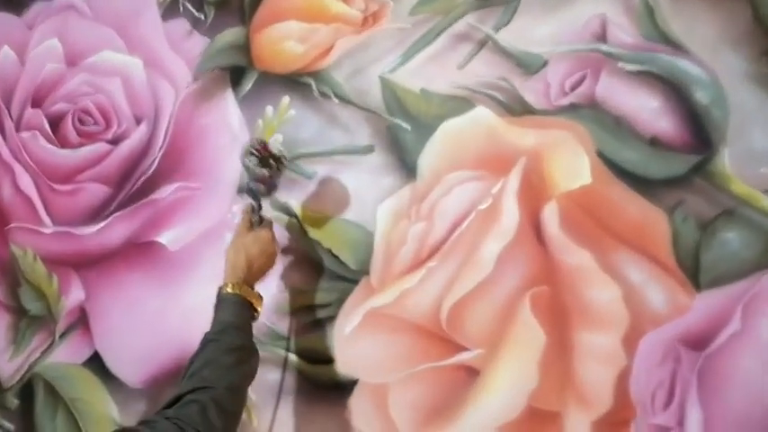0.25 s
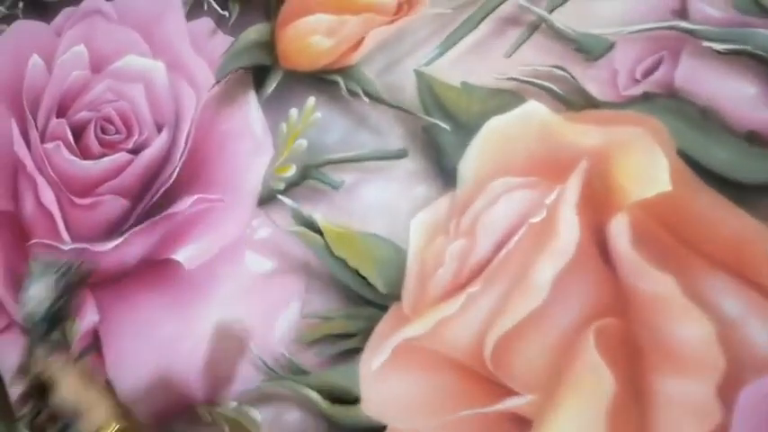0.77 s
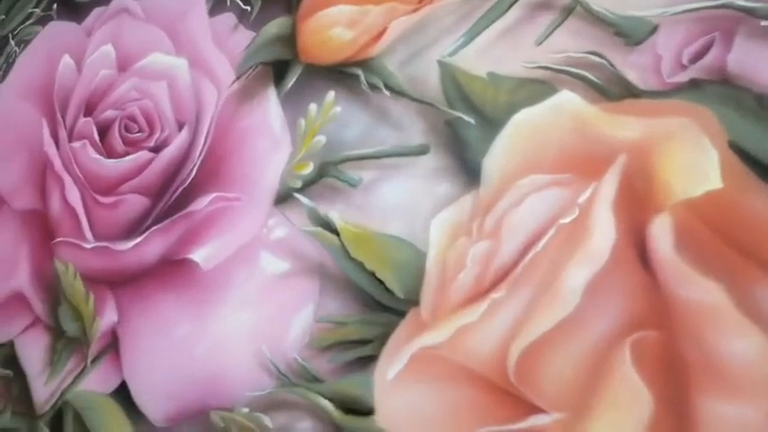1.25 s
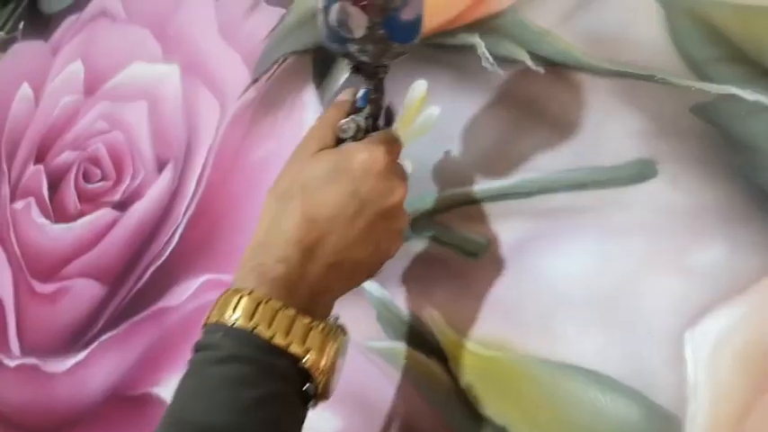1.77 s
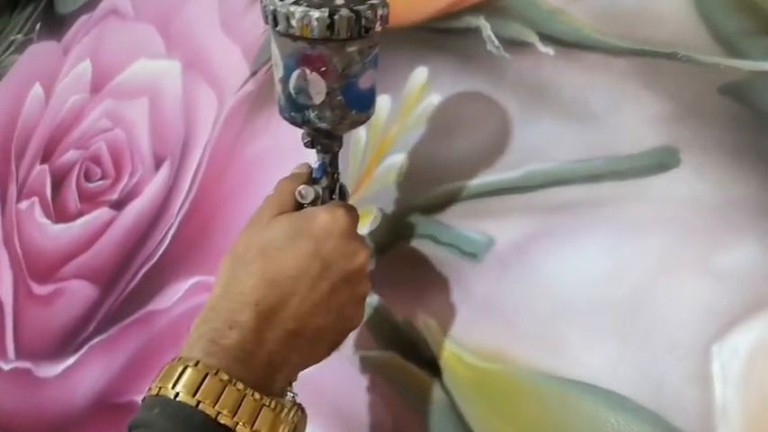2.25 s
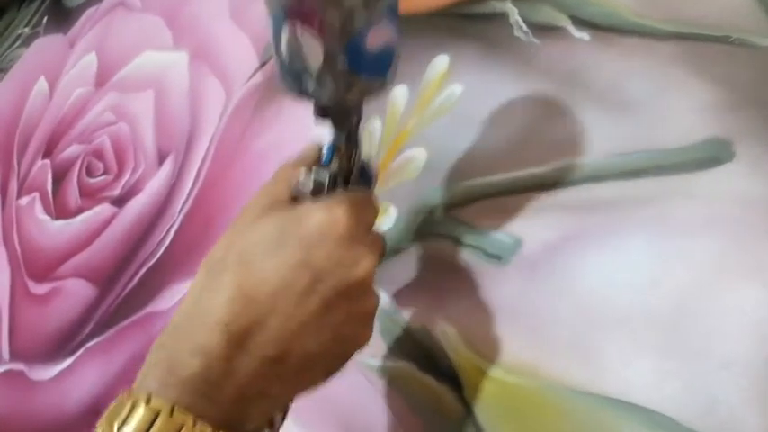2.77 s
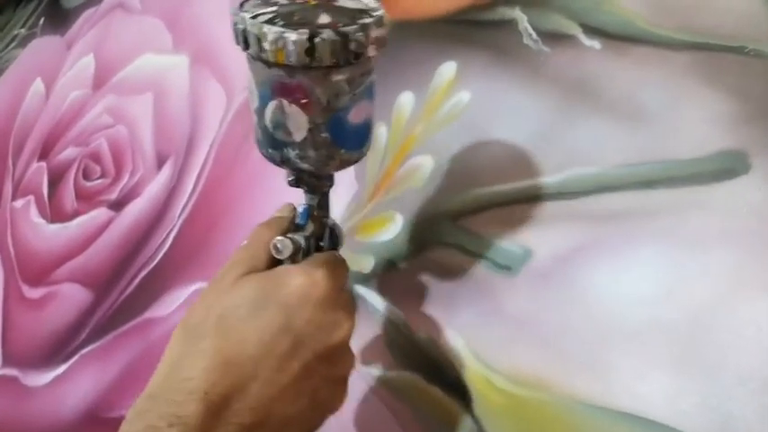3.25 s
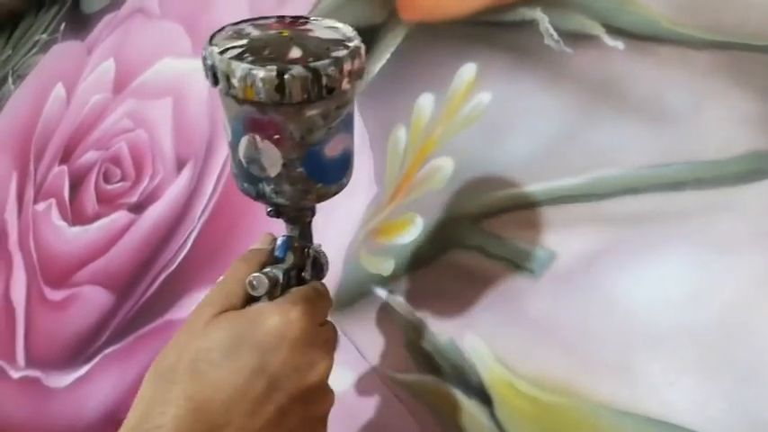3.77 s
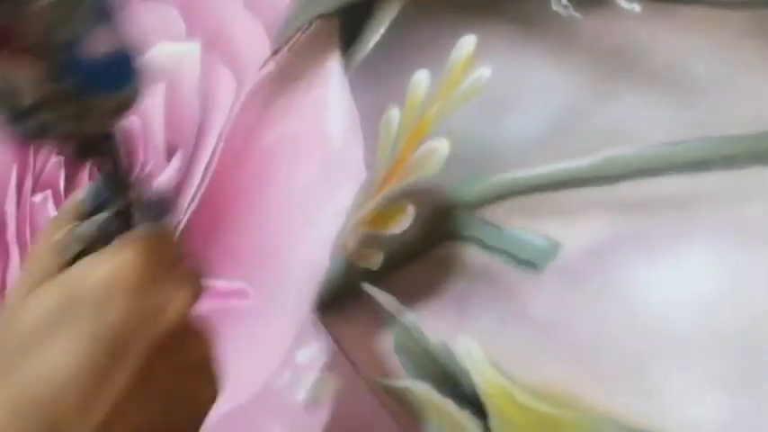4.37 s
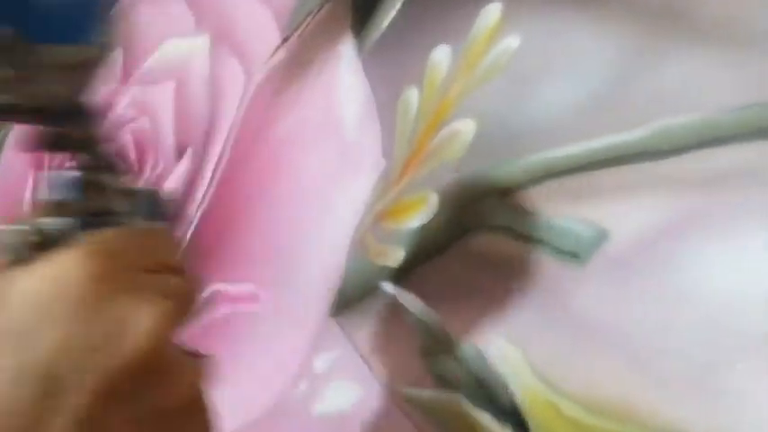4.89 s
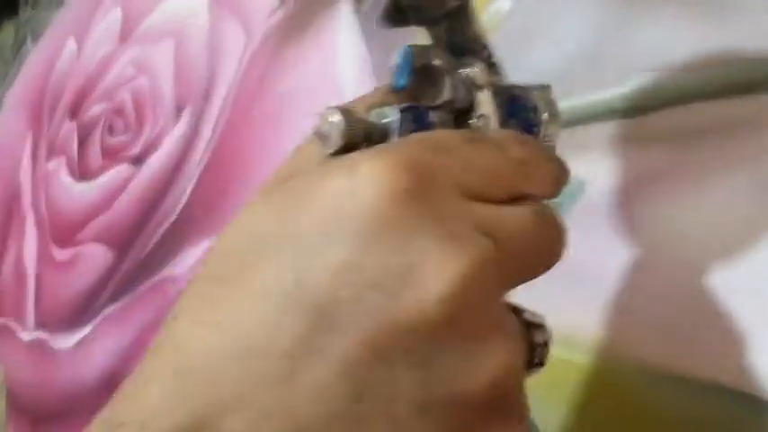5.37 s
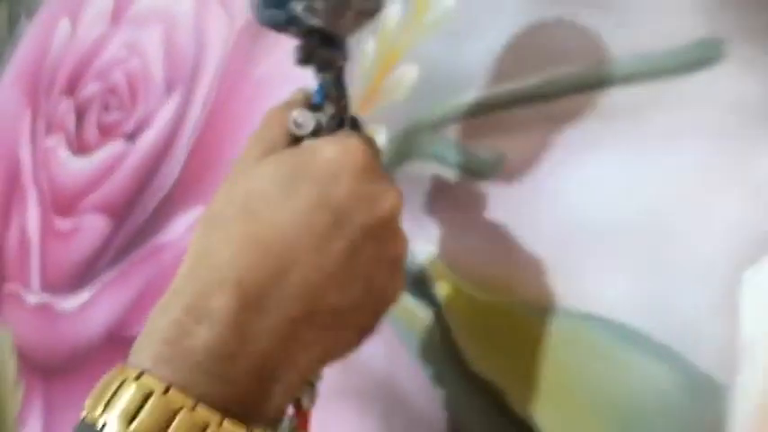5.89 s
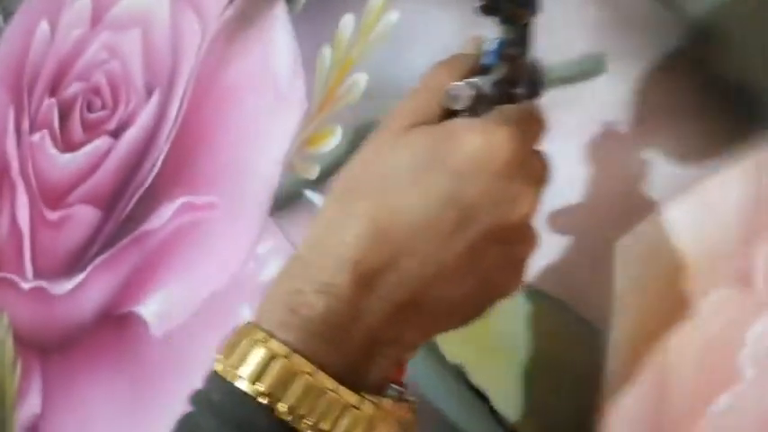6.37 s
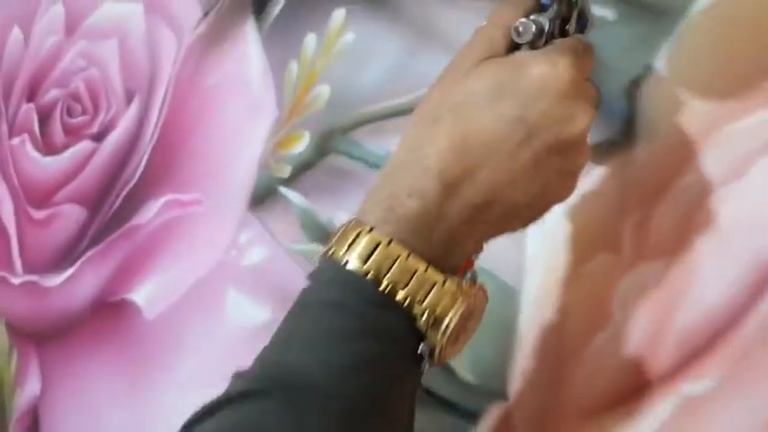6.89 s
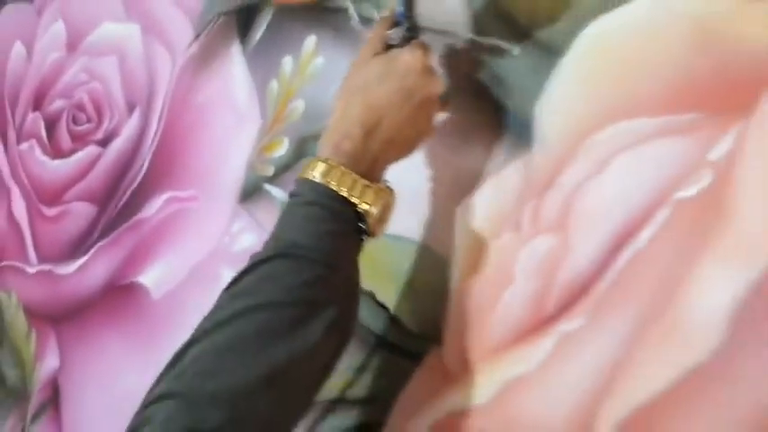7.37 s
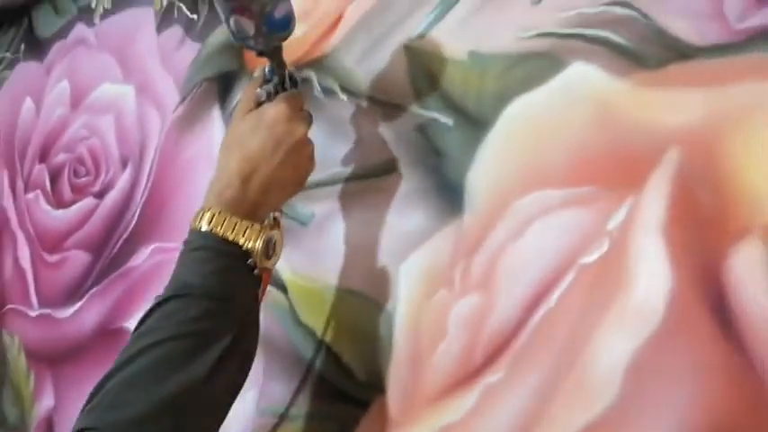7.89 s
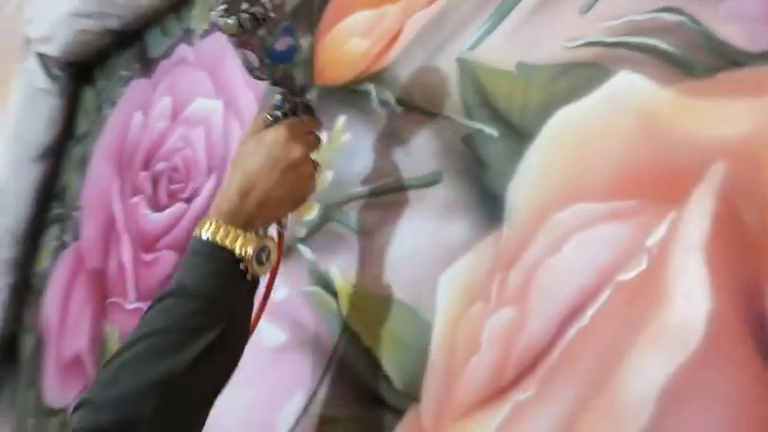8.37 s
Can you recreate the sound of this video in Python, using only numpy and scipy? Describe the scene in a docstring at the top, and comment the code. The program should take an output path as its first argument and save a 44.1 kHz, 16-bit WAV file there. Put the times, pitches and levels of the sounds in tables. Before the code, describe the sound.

Sharp airy paint-spray hiss in long bursts, broken by a pause with a low compressor drone, then a split-second trigger release before continuing.

```python
"""Spray gun on a wall

A small spray gun hisses paint onto a wall close by; the trigger is let go twice.
The jet is shaped noise at the nozzle, the wall wash is a lagging diffuse noise, and a few close tones whine.
A piston compressor, summed from shaft orders and puffs, throbs in the long pause; a faint room lies under all."""
import sys
import numpy as np
from scipy import signal
from scipy.fft import rfft, irfft, next_fast_len
from scipy.io import wavfile
from scipy.ndimage import uniform_filter1d, map_coordinates

SR = 44100
rng = np.random.default_rng(int(sys.argv[2]) if len(sys.argv) > 2 else 0)


def materialize(psi):
    """Save the field psi as 16-bit PCM at rate SR to the path in sys.argv[1].

    A 1-D psi becomes a single channel; in a 2-D psi each row is a channel.
    """
    bounded = np.clip(np.atleast_2d(psi).T, -1, 1)
    quanta = np.round(bounded * 32767).astype(np.int16)
    wavfile.write(sys.argv[1], SR, quanta)


N = 381024

# Trigger pulls: pulled t/s, opening time/s, released t/s
TRIGGER_PULLS = [(-.2, .1, .54), (1.44, .11, 4.865), (4.943, .07, 8.64)]
# Valve closing: a fast drop, then a thin tail lingering in the room
CLOSING_DB_PER_S, TAIL_DB, TAIL_DB_PER_S = 255, -12.5, 93
JET_LEAK_DB, WASH_LEAK_DB = -50, -38  # what remains of each while the valve is closed

# The gun nearing and leaving the microphone: t/s, open jet level before trim/dB
NEARNESS = [(0, -31.5), (.22, -33.5), (.4, -33), (.52, -35), (1.53, -28.5), (1.62, -27.5), (1.72, -29),
            (1.77, -32.5), (1.81, -30.5), (1.85, -27), (1.96, -27), (2.1, -28), (2.55, -29.5), (2.79, -29),
            (2.95, -32.5), (3.22, -31), (3.45, -33), (3.8, -32.5), (4.07, -33.5), (4.29, -32.5),
            (4.48, -35), (4.82, -35), (5.01, -35.5), (5.08, -36), (5.21, -40), (5.31, -33.5), (5.5, -33),
            (5.78, -34), (5.9, -37), (6.2, -36), (6.55, -35.5), (6.67, -37.5), (7.3, -37.5), (7.5, -37),
            (8.1, -38.5), (8.33, -35.5), (8.64, -37.5)]
# The hand swings the nozzle from side to side: t/s, left minus right level/dB
NOZZLE_AIM = [(0, -2), (1.5, -3), (1.95, 0), (2.55, -1), (2.9, 4), (3.25, -1), (4.25, 0), (4.5, 2.5),
              (4.75, -2.5), (5.02, 3), (5.22, -1.5), (5.48, 5.5), (5.76, 6), (6.15, -1.5), (6.85, 5.5),
              (7.3, 0.5), (8.64, -1.5)]
# Spectrum of the jet core: f/Hz, relative level/dB
NOZZLE_SPECTRUM = [(2500, -65), (4200, -17), (5200, -10), (5850, -4.5), (6250, -5.5), (7200, 1),
                   (7800, 1.5), (8400, -7), (9300, -4), (10500, -8.5), (12000, -10.5), (14000, -13.5),
                   (15100, -12.5)]
# Spectrum of the bright lobe facing ahead: f/Hz, relative level/dB
LOBE_SPECTRUM = [(7800, -40), (8700, -1.5), (9400, -7.5), (10100, -8), (11000, -13), (12500, -46),
                 (15000, -44)]
LOBE_DB, LOBE_PER_AIM = -12.5, -0.87  # level against the core; dB change per dB of swing to the left
# Balance of the two microphone ports: f/Hz, left minus right level/dB
PORT_BALANCE = [(4000, -2), (6000, 0.5), (7500, 3.5), (8400, 4), (9700, -5.5), (11500, -3.5), (13000, 6),
                (15000, 0)]
# Likeness of the two ports: f/Hz, correlation (1 is identical)
PORT_LIKENESS = [(60, 1), (300, 0), (700, 0), (1500, 0.12), (3200, 0.066), (5500, 0), (6400, 0.33),
                 (7200, 0.64), (8300, 0.63), (10000, 0.74), (12000, 0.54), (15000, 0.12)]

# Depth of the wash on the wall: t/s, low-edge level against the usual/dB
WASH_DEPTH = [(0, -4.5), (.33, 3), (.62, -3.5), (1.55, -8), (1.78, 6.5), (2.14, -13), (2.28, 7), (2.42, 13),
              (2.68, 8), (2.87, -9), (3.25, 10), (3.65, -3), (4.45, -6.5), (4.8, 0), (5.01, -15), (5.18, 4),
              (5.43, -11), (5.85, 4.5), (6.2, 8), (6.6, -0.5), (6.87, -5), (7.42, 12), (7.9, 1.5),
              (8.64, -4)]
# Wash against its usual share: t/s, level/dB
WASH_SHARE = [(0, -2), (.5, 0), (1.5, 3.5), (1.95, 0.3), (2.35, 0), (4.5, 0), (4.8, 0.5), (5.2, 0.5),
              (5.6, -5), (6.2, -0.5), (6.5, 0.5), (7.1, -3), (7.6, -.5), (8.3, 1)]
# Spectrum of the upper wash: f/Hz, relative level/dB
UPPER_SPECTRUM = [(1400, -42), (2000, -8.5), (2400, -0.5), (2900, .5), (3500, -0.5), (4300, -1.5),
                  (5500, 1), (8000, -30)]
# Spectrum of the wash body: f/Hz, relative level/dB
BODY_SPECTRUM = [(1050, -76), (1400, -9), (1650, -3), (2000, 0.5), (2400, -9.5), (3200, -29)]
# Spectrum of the deep wash: f/Hz, relative level/dB
DEEP_SPECTRUM = [(700, -10), (950, -15), (1130, -3.5), (1350, -7), (1650, -19), (2400, -79)]
# Wash bands: base level in dB, and the share of the depth that two of them follow
UPPER_DB, UPPER_FOLLOWS = -10.5, 0.13
BODY_DB, BODY_FOLLOWS = -20.5, 0.44
DEEP_DB = -30
USUAL_NEAR_DB, WASH_PER_NEAR = -35.5, 0.075  # usual jet level; extra wash dB per dB above it
WASH_LAG_S = 0.01
WASH_CLOSES, WASH_OPENS = 0.69, 1.3  # share of the jet's closing speed; multiple of its opening time

# Narrow resonances colouring the hiss: f/Hz, width/Hz, peak level/dB
HISS_RINGS = [(5100, 26, 5), (5630, 34, 5.5), (5870, 39, 3.5), (6030, 33, -0.5), (6370, 45, 4),
              (6720, 29, 0.5), (7530, 47, 2), (8300, 45, 6), (8940, 17, -4), (9370, 33, 7), (10100, 30, 3)]
# Steep lower edge of the hiss: t/s, f/Hz
HISS_EDGE = [(0, 650), (1.4, 700), (1.52, 1580), (1.62, 1430), (1.83, 1460), (1.9, 1260), (2.14, 1440),
             (2.26, 1030), (2.68, 1070), (2.82, 1240), (3.25, 940), (3.65, 1150), (4.1, 920), (4.55, 1086),
             (4.9, 1040), (5.0, 2230), (5.07, 2260), (5.16, 1330), (5.3, 1380), (5.44, 1830), (5.55, 1140),
             (5.85, 1200), (6.15, 920), (6.6, 850), (6.88, 1360), (7.15, 1240), (7.35, 850), (8.64, 854)]
EDGE_WAVER_HZ = 75  # scale of its random wander
DULL_DB, DULL_HZ = -2, 11500  # softer treble before the gap, above this frequency

# Shrill band in the hiss: t/s, centre f/Hz, level before panning/dB
SHRILL_GLIDE = [(3.35, 9600, -91), (3.58, 9680, -42), (3.8, 9930, -41.5), (4.05, 10180, -51),
                (4.3, 9700, -39.5), (4.6, 9550, -65)]
SHRILL_WIDTH_HZ = 760  # half-width, 12 dB down
# Thin whine: t/s, level/dB
WHINE_LEVEL = [(0, -88), (.85, -84), (1.15, -74), (1.42, -63), (1.55, -75), (1.9, -59), (2.35, -52),
               (2.62, -48), (2.95, -57), (3.25, -48), (3.55, -80), (5.2, -78), (6.15, -57), (6.7, -66),
               (8.64, -66)]
# Close tones of the whine: f/Hz, drift/Hz, relative level/dB
WHINE_TONES = [(1712, 3, 0), (1761, 9, -9), (1663, 6, -12)]
# Spits at the nozzle: t/s, level/dB, centre f/Hz, half-width/Hz, swell length/s
SPITS = [(4.836, -42, 7400, 1200, .003), (5, -42, 7400, 900, .006), (5.01, -40, 7400, 900, .003),
         (5.03, -38, 7500, 900, .004)]
# Light knock in the gun: t/s, decay starting level/dB, f/Hz, 60 dB decay time/s
KNOCK = (1.8995, -14, 1620, .014)
KNOCK_RISE_S = 0.003
# Brief cut in the hiss: from t/s, to t/s, level/dB
HISS_GAP = (1.736, 1.764, -19.5)
THUMP_LEAD_S = 0.017  # the thump begins this long before the gap

IDLE_DB = -72  # air seeping past the closed valve
# Spectrum of the seeping air: f/Hz, relative level/dB
IDLE_SPECTRUM = [(3200, -16), (4000, -4), (5000, -12), (5800, -12), (6600, -7), (7500, -5), (8200, -13),
                 (9400, -13), (11000, -31), (15000, -45)]
# Air sighing out after the first release: t/s, level/dB, centre f/Hz, half-width/Hz, swell length/s
SIGHS = [(.76, -56, 1100, 520, .06), (.73, -64, 2200, 800, .07)]

# Compressor before trim: t/s, drone level/dB, low hum level/dB
PUMP_LEVELS = [(0, -58, -64.5), (.55, -59, -64), (.77, -48.5, -55), (1.13, -45, -49), (1.44, -47.5, -56),
               (1.56, -63, -69), (1.8, -60, -62), (1.88, -87, -84), (2.2, -81, -96), (2.33, -75, -69),
               (2.55, -71, -82), (2.78, -74, -65), (3.3, -74, -65), (4.0, -71, -69), (4.9, -75, -63.5),
               (5.32, -73.5, -67.5), (5.6, -78, -77), (6.25, -73, -62.5), (6.85, -77.5, -67),
               (7.15, -65.5, -66), (7.6, -54, -58), (8.1, -60.5, -66.5), (8.64, -65, -67)]
SHAFT_HZ = 40.8
# Shaft orders of the drone: multiple of shaft f, relative level/dB
DRONE_ORDERS = [(5, -25), (6, -1), (7, 2.5), (8, -20), (9, -26), (10, -20), (11, -23), (12, -14), (13, -26),
                (14, -17), (15, -12.5), (16, -19), (17, -26), (20, -31), (24, -24), (25, -22), (31, -28)]
# Shaft orders of the low hum: multiple of shaft f, relative level/dB
HUM_ORDERS = [(1.5, -15), (2, -18), (3, -6.5), (4, -19.5)]
# Spectrum of the puffs: f/Hz, relative level/dB
PUFF_SPECTRUM = [(30, -9), (80, -20), (300, 1.5), (430, -8), (620, -8), (780, -11.5), (1020, -11),
                 (1450, -16), (1750, -11), (2100, -17.5), (2900, -32), (5000, -71)]
DRONE_TRIM_DB, HUM_TRIM_DB = -5, -3
DRONE_WAVER_DB, DRONE_WAVER_PER_DB = 1, 0.05  # waver of each order; more per dB that the drone sinks
HUM_WAVER_PER_DB, HUM_WAVER_MOST_DB = 0.18, 3  # waver per dB that the hum sinks; its limit

RUMBLE_DB, FAINT_DB = -70.5, -71  # usual levels of the low rumble and the faint rush
RUMBLE_FOLLOWS, FAINT_FOLLOWS = 0.7, 0.18  # share of the hum's swing that each follows
SWING_MOST_DB = 6.5  # upward limit of the hum's swing about its mean
# Spectrum of the rumble: f/Hz, relative level/dB
RUMBLE_SPECTRUM = [(15, -39), (28, -5), (48, 2), (70, -4), (110, 1), (200, -5), (400, -11), (900, -41)]
# Spectrum of the faint rush: f/Hz, relative level/dB
FAINT_SPECTRUM = [(150, -5), (350, -7), (600, -4.5), (900, -3.5), (1500, -7), (5000, -35.5)]
TOP_HZ = 15280


def amp(db):
    """Gain of a level in dB."""
    return 10 ** (np.asarray(db) / 20)


def unit(x):
    """x scaled to rms 1."""
    return x / np.sqrt(np.mean(x ** 2) + 1e-20)


def along(points, hz):
    """Read (Hz, value) points on a log frequency axis."""
    f, v = np.transpose(points)
    return np.interp(np.log(hz + 1), np.log(f + 1), v)


def clock():
    """The time of each sample in seconds."""
    return np.arange(N) / SR


def curves(rows):
    """One value per sample for each column after the time."""
    s, *columns = np.transpose(rows)
    return [np.interp(clock(), s, column) for column in columns]


def wobble(rate):
    """A smooth random curve with rate knots a second."""
    knots = rng.standard_normal(int(N * rate / SR) + 4)
    return map_coordinates(knots, [clock() * rate])


def filtered(x, response):
    """x shaped by a response of frequency."""
    m = next_fast_len(N + SR // 2)
    hz = np.fft.rfftfreq(m, 1 / SR)
    return irfft(rfft(x, m) * response(hz), m)[..., :N]


def panned(db):
    """Left and right gains for a level difference."""
    return amp(np.array([[.5], [-.5]]) * db)


def rush(spectrum, alike, patchy_db):
    """Turbulent stereo noise with fine patches of random gain; its middle has rms 1."""
    z = signal.stft(rng.standard_normal((2, N)), nperseg=512)[2]
    patches = uniform_filter1d(rng.standard_normal(z.shape[1:]), size=3, axis=0)
    patches = uniform_filter1d(patches, size=5, axis=1)
    pair = signal.istft(z * amp(patchy_db * unit(patches)), nperseg=512)[1][:, :N]

    def mid_side(hz):
        # this split of middle and side sets the likeness of left and right
        turn = np.arccos(np.clip(along(alike, hz), -1, 1)) / 2
        return amp(along(spectrum, hz)) * np.array([np.cos(turn), np.sin(turn)])

    mid, side = filtered(pair, mid_side)
    return np.array([mid + side, mid - side]) / np.std(mid)


def narrow(hz, width_hz):
    """Noise of rms 1 in one resonance with steep skirts."""
    noise = rng.standard_normal(N)
    return unit(filtered(noise, lambda f: (1 + ((f - hz) / width_hz) ** 2) ** -2))


def burst(s, db, hz, width_hz, length):
    """A smooth swell of noise in one resonance."""
    swell = np.exp(-((clock() - s) / length) ** 2)
    return amp(db) * swell * narrow(hz, width_hz)


def valve(lag_s, leak_db, closes=1, opens=1):
    """Air flow in dB: each pull opens it and holds; on release it drops fast, leaving a thin tail."""
    t = clock() - lag_s

    def opening(start, rise):
        progress = np.clip((t - start) / (opens * rise), 0, 1)
        return 20 * np.log10(np.sin(np.pi / 2 * progress) ** 2 + 1e-6)

    def closing(after):
        return np.maximum(-closes * CLOSING_DB_PER_S * after, TAIL_DB - TAIL_DB_PER_S * after)

    pulls = [np.minimum(opening(start, rise), closing(t - released))
             for start, rise, released in TRIGGER_PULLS]
    return np.clip(np.max(pulls, axis=0), leak_db, 0)


def jet():
    """Air tears the paint into droplets at the nozzle; the uneven feed makes the hiss flutter."""
    near_db, = curves(NEARNESS)
    aim_db, = curves(NOZZLE_AIM)
    core = rush(NOZZLE_SPECTRUM, PORT_LIKENESS, patchy_db=3.5)
    core = filtered(core, lambda hz: panned(along(PORT_BALANCE, hz)))
    lobe_gain = amp(LOBE_DB + LOBE_PER_AIM * aim_db) * panned(-12.0)
    lobe = lobe_gain * rush(LOBE_SPECTRUM, [(9500, 1.0)], patchy_db=2)
    flutter_db = 0.24 * wobble(9.8) + 0.86 * wobble(35) + 0.63 * wobble(400)
    level_db = near_db + valve(0, JET_LEAK_DB) + flutter_db - 0.95
    return amp(level_db) * panned(aim_db) * (core + lobe)


def wash():
    """The stream spreads over the wall: a lagging, slower rush whose low bands swell most with depth."""
    near_db, = curves(NEARNESS)
    depth_db, = curves(WASH_DEPTH)
    share_db, = curves(WASH_SHARE)
    upper = amp(UPPER_DB + UPPER_FOLLOWS * depth_db) * rush(UPPER_SPECTRUM, PORT_LIKENESS, patchy_db=2.5)
    body = amp(BODY_DB + BODY_FOLLOWS * depth_db) * rush(BODY_SPECTRUM, PORT_LIKENESS, patchy_db=3.5)
    deep = amp(DEEP_DB + depth_db) * rush(DEEP_SPECTRUM, PORT_LIKENESS, patchy_db=6.5)
    level_db = near_db + share_db + WASH_PER_NEAR * (near_db - USUAL_NEAR_DB)
    level_db = level_db + valve(WASH_LAG_S, WASH_LEAK_DB, WASH_CLOSES, WASH_OPENS)
    return amp(level_db + 1.05 * wobble(12)) * (upper + (body + deep) * panned(-1.6))


def walls(x, echo_db, count=12):
    """Nearby surfaces return weak copies that ripple the spectrum of the hiss."""
    echoes = np.zeros_like(x)
    for lags in rng.uniform(.002, .028, (count, 2)):  # seconds, one lag for each ear
        for ear, lag in enumerate(lags):
            echoes[ear] += np.pad(x[ear], (round(lag * SR), 0))[:N]
    return (x + amp(echo_db) * echoes / np.sqrt(count)) / np.hypot(1, amp(echo_db))


def coloured(x):
    """Narrow resonances ripple the hiss, and its steep lower edge moves over time."""
    def rings(f):
        return amp(sum(db / (1 + (2 * (f - hz) / width) ** 2) for hz, width, db in HISS_RINGS))

    hz, s, z = signal.stft(filtered(x, rings), SR, nperseg=1024)
    edge_hz = np.interp(s, *np.transpose(HISS_EDGE))
    edge_hz = edge_hz + EDGE_WAVER_HZ * np.interp(s, clock(), wobble(16))
    steep = 1 / (1 + (edge_hz / (hz[:, None] + 1)) ** 14)
    return signal.istft(z * steep, SR, nperseg=1024)[1][:, :N]


def dulled(x):
    """A high shelf softens the top treble until the gap."""
    soft = filtered(x, lambda hz: amp(DULL_DB / (1 + (DULL_HZ / (hz + 1)) ** 12)))
    return np.where(clock() < HISS_GAP[0], soft, x)


def shrill():
    """A band of the hiss stands out and glides: narrow noise carried on a moving tone."""
    hz, db = curves(SHRILL_GLIDE)
    carrier = np.cos(2 * np.pi * np.cumsum(hz) / SR)
    band = unit(narrow(0, SHRILL_WIDTH_HZ) * carrier)
    sounding = (clock() > SHRILL_GLIDE[0][0]) * (clock() < SHRILL_GLIDE[-1][0])
    return amp(db) * band * panned(-11.5) * sounding


def whine():
    """A steady thin whine, with two weak, less steady neighbours."""
    level_db, = curves(WHINE_LEVEL)

    def tone(hz, drift):
        phase = 2 * np.pi * np.cumsum(hz + drift * wobble(25)) / SR
        return unit(np.cos(phase + rng.normal(0, 0.78, (2, 1))))

    tones = sum(amp(db + 0.47 * wobble(13)) * tone(hz, drift) for hz, drift, db in WHINE_TONES)
    return amp(level_db) * tones


def spits():
    """Blobs of paint leave the nozzle in short bursts of narrow noise."""
    return sum(burst(*row) for row in SPITS)


def knock():
    """One light knock rings briefly in the gun as a decaying sine."""
    s, db, hz, t60 = KNOCK
    t = np.clip(clock() - s, 0, 1)
    rise = np.sin(np.pi / 2 * np.minimum(t / KNOCK_RISE_S, 1)) ** 2
    return amp(db - 60 * t / t60) * rise * np.sin(2 * np.pi * hz * t)


def gap():
    """Gain of the instant in which the hiss cuts out, with softened edges."""
    start, end, db = HISS_GAP
    inside = 1. * ((clock() > start) & (clock() < end))
    return amp(db * uniform_filter1d(inside, size=64))


def thump():
    """A soft low thump builds before the gap and lasts through most of it: a low-passed ramp."""
    start, end, _ = HISS_GAP
    t = clock()
    build = np.clip((t - start + THUMP_LEAD_S) / THUMP_LEAD_S, 0, 1)
    ramp = -build * (t < end - .006)
    return amp(-43.5) * filtered(ramp, lambda hz: 1 / (1 + 1j * hz / 450) ** 2)


def idle():
    """A little air seeps from the nozzle throughout, a faint hiss under the spray and the pauses."""
    return amp(IDLE_DB) * rush(IDLE_SPECTRUM, PORT_LIKENESS, patchy_db=3.5)


def sigh():
    """The last of the air escapes softly, diffuse at both ports."""
    return np.array([sum(burst(*row) for row in SIGHS) for _ in range(2)])


def compressor():
    """Shaft orders beat into a throb; puffs of air swell with each turn of the shaft."""
    drone_db, hum_db = curves(PUMP_LEVELS)
    angle = 2 * np.pi * np.cumsum(SHAFT_HZ * (1 + 0.0014 * wobble(6))) / SR

    def order(multiple, db, waver_db):
        # the room shifts each order, a little differently at each port
        shift = rng.uniform(0, 2 * np.pi) + rng.normal(0, 0.1, (2, 1))
        return amp(db + waver_db * wobble(11)) * np.cos(multiple * angle + shift)

    def orders(rows, waver_db):
        return unit(sum(order(multiple, db, waver_db) for multiple, db in rows))

    drone_waver_db = DRONE_WAVER_DB + DRONE_WAVER_PER_DB * (drone_db.max() - drone_db)
    drone = orders(DRONE_ORDERS, drone_waver_db)
    puffs = (1 + 0.18 * np.cos(angle)) * rush(PUFF_SPECTRUM, PORT_LIKENESS, patchy_db=3.5)
    # the low hum is steadiest when it is plain
    hum_waver_db = np.minimum(HUM_WAVER_PER_DB * (hum_db.max() - hum_db), HUM_WAVER_MOST_DB)
    hum_gain = amp(hum_db + HUM_TRIM_DB + hum_waver_db * wobble(6.3))
    hum = hum_gain * orders(HUM_ORDERS, waver_db=1)
    return amp(drone_db + DRONE_TRIM_DB) * (drone + amp(-10.0) * puffs) + hum


def room():
    """A restless low rumble follows the compressor hum; a faint rush over it sinks with the hum."""
    _, hum_db = curves(PUMP_LEVELS)
    swing_db = np.minimum(hum_db - hum_db.mean(), SWING_MOST_DB)
    rumble_db = RUMBLE_DB + RUMBLE_FOLLOWS * swing_db + 3 * wobble(9.9)
    faint_db = FAINT_DB + FAINT_FOLLOWS * np.minimum(swing_db, 0)
    rumble = amp(rumble_db) * rush(RUMBLE_SPECTRUM, PORT_LIKENESS, patchy_db=2.5)
    faint = amp(faint_db) * rush(FAINT_SPECTRUM, PORT_LIKENESS, patchy_db=3.5)
    return rumble + faint


def scene():
    """The spray stands out over the compressor and the room."""
    hiss = dulled(coloured(walls(jet() + wash(), echo_db=-8.0)))
    foreground = (hiss + shrill() + whine() + spits() + knock()) * gap()
    return foreground + idle() + sigh() + compressor() + thump() + room()


def record(dry):
    """The microphone keeps nothing above its band limit."""
    return filtered(dry, lambda hz: hz < TOP_HZ)


dry = scene()
out = record(dry)
materialize(out)
```